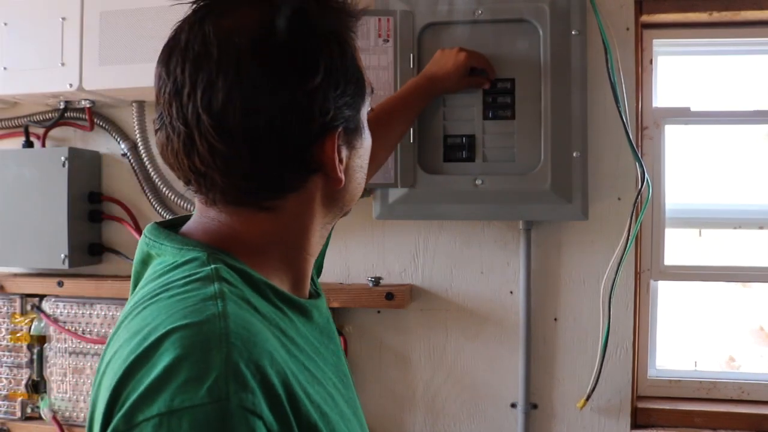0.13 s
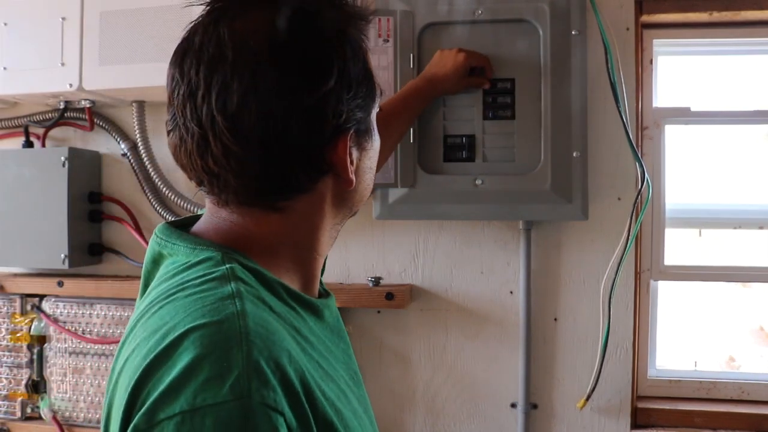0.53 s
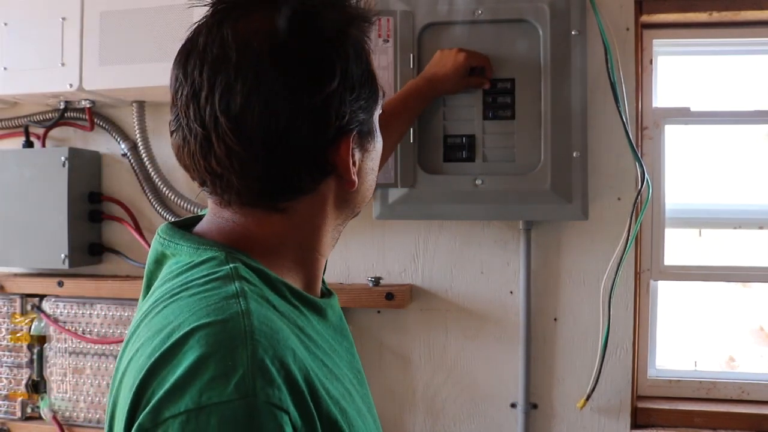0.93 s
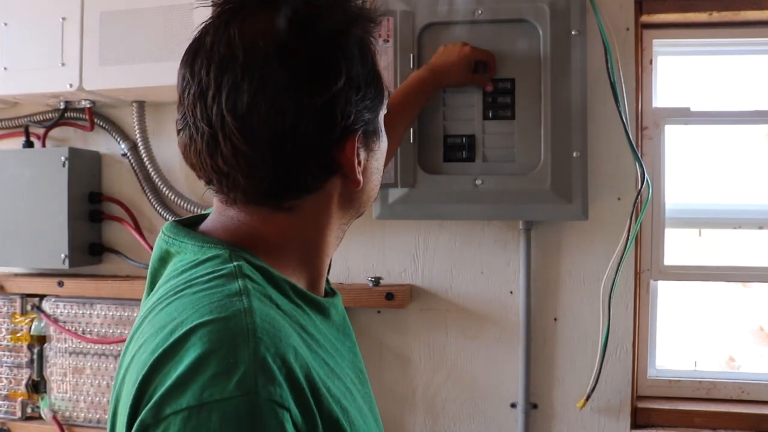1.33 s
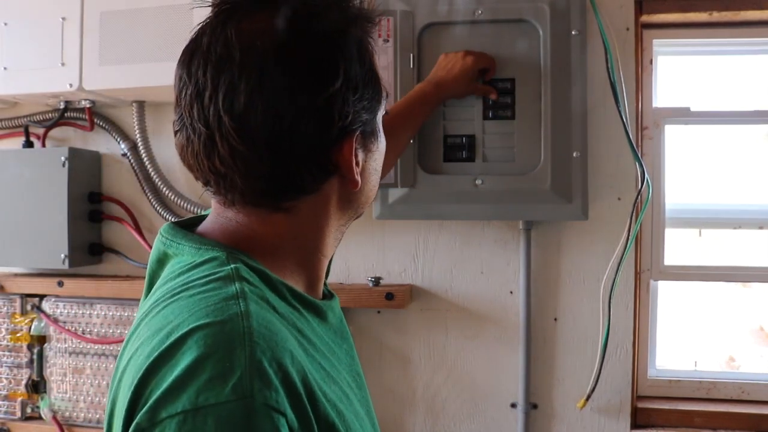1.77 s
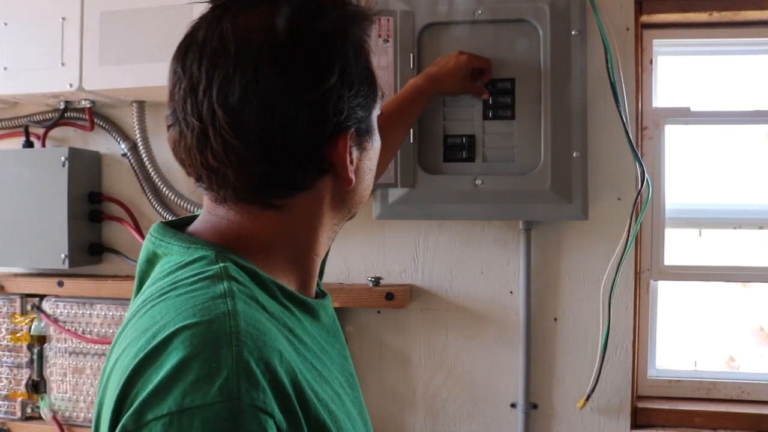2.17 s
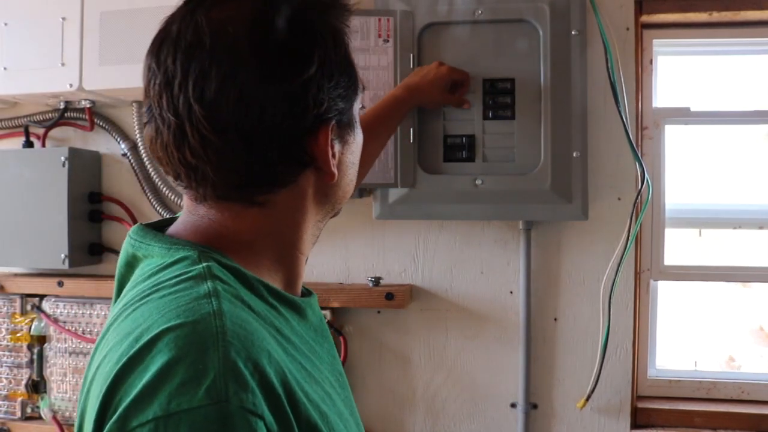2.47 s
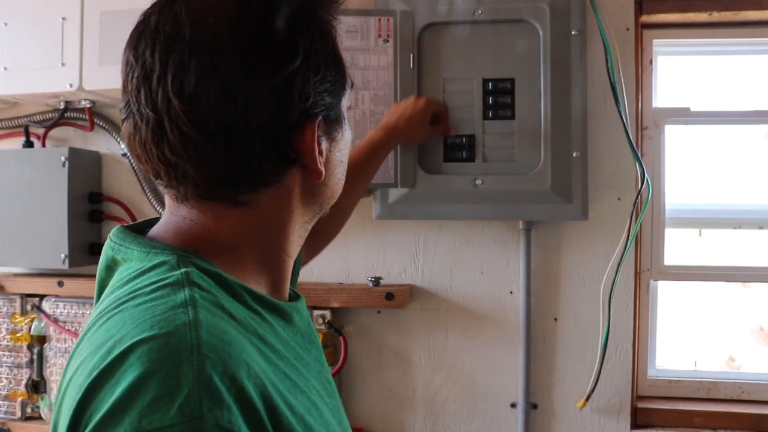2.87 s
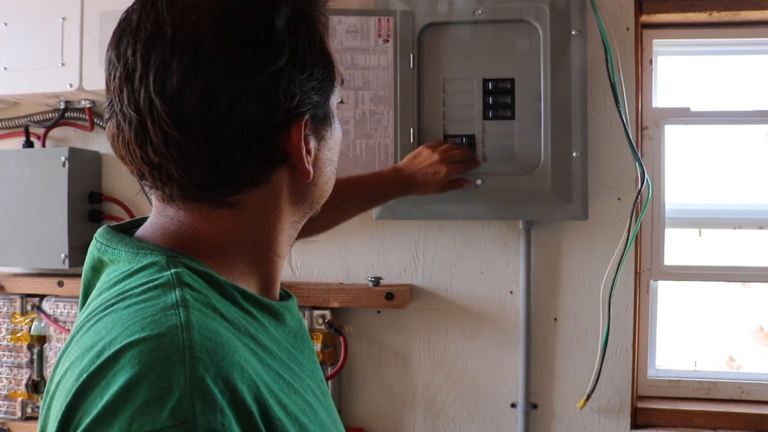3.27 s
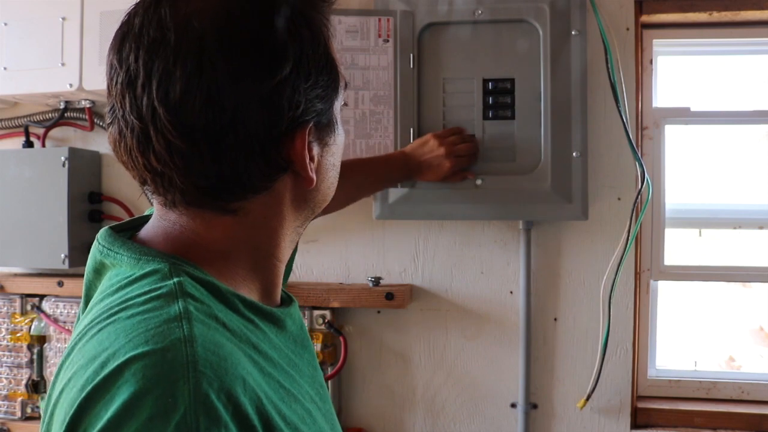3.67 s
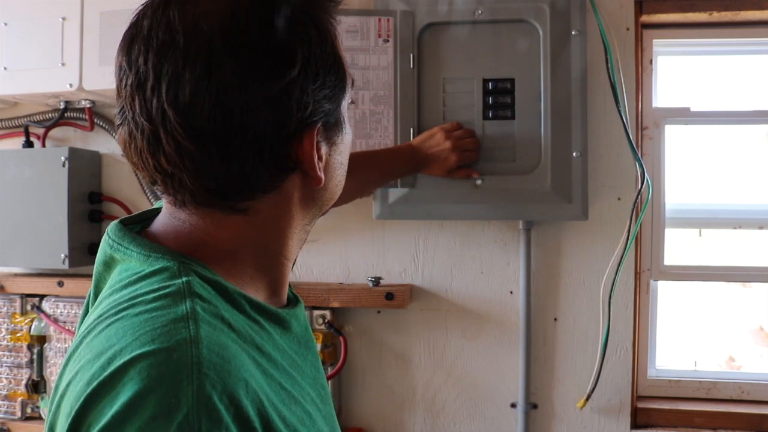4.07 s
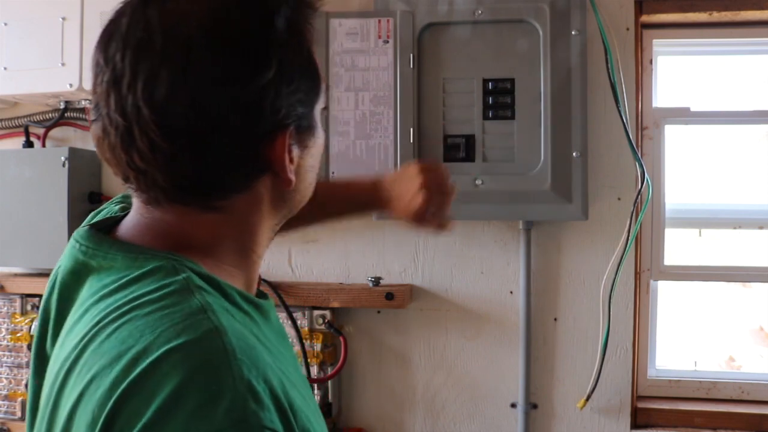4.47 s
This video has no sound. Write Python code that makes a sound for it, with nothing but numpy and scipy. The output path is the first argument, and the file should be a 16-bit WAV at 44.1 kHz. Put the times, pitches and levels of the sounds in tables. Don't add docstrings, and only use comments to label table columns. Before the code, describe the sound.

Low muffled outdoor air and faint electrical whines. Two bright, spring-loaded plastic snaps come under a second apart, each preceded by a small latch tick and followed by a short metallic ring. Later, grip clicks lead to a deeper, longer slam; the steel cover shudders, then the hand knocks it on leaving. Close microphone, clipping on the slams, its level ducking briefly; short wooden-room tail.

```python
import sys
import numpy as np
from scipy import signal
from scipy.io import wavfile
from scipy.ndimage import uniform_filter1d

SR = 44100
rng = np.random.default_rng(int(sys.argv[2]) if len(sys.argv) > 2 else 0)


def pcm_store(signal):
    levels = np.round(np.clip(np.atleast_2d(signal), -1, 1) * 32767)
    wavfile.write(sys.argv[1], SR, levels.astype(np.int16).T)


def ratio(d):
    e = np.asarray(d, float) / 20
    return 10 ** e


N = 202931
MAIN_GRIP_S = 2.5


def at_hz(points, hz):
    table = np.array(points)
    return np.interp(np.log(hz), np.log(table[:, 0]), table[:, 1])


def rms_one(x):
    return x / np.sqrt(np.mean(x ** 2) + 1e-20)


def drift(rate_hz):
    count = int(N / SR * 40) + 2
    slow = uniform_filter1d(rng.standard_normal(count), size=3)
    return np.interp(np.arange(N) / SR * np.clip(rate_hz, 0.1, 39), np.arange(count), rms_one(slow))


def ring(clicks, hz, t60):
    r = ratio(-60 / (t60 * SR))
    w = 2 * np.pi * min(hz, SR / 2 - 2000) / SR
    return signal.lfilter([0, np.sin(w)], [1, -2 * r * np.cos(w), r * r], clicks + 1e-18)


def narrow_noise(length, hz, width_hz):
    return ring(rng.standard_normal(length), hz, np.log(1000) / np.pi / width_hz)


def bands():
    edges = 22 * 2 ** (np.arange(30) / 3)
    white = rng.standard_normal((2, N))
    for k, (low, high) in enumerate(zip(edges, edges[1:])):
        sos = signal.butter(2, [low, high], "band", fs=SR, output="sos")
        yield np.sqrt(low * high), signal.sosfilt(sos, white[k % 2])


def add(out, s, x):
    at = round(s * SR)
    out[at:at + len(x)] += x[:N - at]


def slam_s(rows):
    return rows[1][0]


# frequency in Hz, level in dB per Hz.
AIR = [(15, -48), (25, -23), (87, -2.5), (135, -6), (168, -5), (201, -11.5), (245, -6), (408, -11),
       (582, -12), (1040, -15), (1970, -19), (2510, -18.5), (5000, -26.5), (6500, -58), (11000, -120)]
# time in seconds, level in dB.
BREEZE = [(0.0, -58.5), (0.4, -54), (0.801, -56.5), (1.5, -56.5), (2.001, -54.5), (2.3, -58.5),
          (2.801, -57.5), (3.0, -59), (3.4, -57), (3.8, -54.5), (4.6, -56)]


def air(rumble_hz, patchy_db):
    t = np.arange(N) / SR
    settle_s, rumble_rest_db, shake_db = 0.9, -4.5, 9
    slams = [slam_s(rows) for rows in (SMALL_A, SMALL_B, MAIN)]
    shake = sum((t > s) * np.exp(-np.abs(t - s) / settle_s) for s in slams)
    rumble_db = rumble_rest_db + shake_db * np.tanh(uniform_filter1d(shake, size=8192))
    out = 0
    for hz, noise in bands():
        low_db = rumble_db / (1 + (hz / rumble_hz) ** 2)
        out = out + noise * ratio(at_hz(AIR, hz) + low_db + patchy_db * drift(8))
    return rms_one(out) * ratio(np.interp(t, *np.transpose(BREEZE)) - 2.0)


# frequency in Hz, level in dB, start in seconds, end in seconds, width in Hz.
WHINES = [(600, -66.5, 0.05, 0.5, 25), (550, -67, 0.5, 1.7, 25), (1801, -70, -0.5, 1.8, 10),
          (2043, -73, -0.5, 2.1, 10), (1921, -72.5, 2.0, 4.0, 10), (620, -70, 2.7, 3.4, 40)]


def whines(blur_db):
    t, out = np.arange(N) / SR, 0
    for hz, db, start, end, width_hz in WHINES:
        blur = ratio(blur_db) * rms_one(narrow_noise(N, hz, width_hz))
        line = np.sin(2 * np.pi * hz * t) * 10 / width_hz
        gate = np.clip(np.minimum(t - start, end - t) / 0.028, 0, 1)
        out = out + ratio(db) * gate * rms_one(blur + line)
    return out


# frequency in Hz, t60 in seconds.
TAIL_T60 = [(60, 0.43), (100, 0.45), (200, 0.49), (500, 0.39), (1500, 0.35), (3000, 0.31), (6000, 0.25),
            (10000, 0.27), (15000, .22)]


def tail(groups, boom_hz, patchy_db):
    out = 0
    for hz, noise in bands():
        energy = np.zeros(N) + 1e-18
        for contacts, colour in groups:
            s, tail_db, boom_db = np.array(contacts)[:, [0, 4, 5]].T
            level_db = tail_db + at_hz(colour, hz) + boom_db / (1 + (hz / boom_hz) ** 2)
            energy[np.round(s * SR).astype(int)] = ratio(2 * level_db)
        fall = ratio(-120 / (at_hz(TAIL_T60, hz) * SR))
        rise = np.exp(-1 / ((0.0024 + 1.5 / hz) * SR))
        energy = signal.lfilter([1 - rise], np.convolve([1, -fall], [1, -rise]), energy)
        out = out + noise * np.sqrt(np.abs(energy)) * ratio(13.0 + patchy_db * drift(30))
    return out


# frequency in Hz, level in dB per Hz.
TAIL_SMALL = [(24, -58.5), (60, -29), (150, -21), (300, -4), (700, -9.5), (1400, -9.5), (2200, -16.5),
              (3200, -2), (5400, -12.5), (8000, -17), (11000, -24), (16000, -31.5)]
TAIL_MAIN = [(24, -64.5), (60, -19), (130, -9.5), (270, -3.5), (600, -7), (1300, -4.5), (2100, -9),
             (3200, -4), (5000, -16), (7500, -21), (11000, -29.5), (16000, -49)]


def shed(small, main, light):
    early = [c for c in light if c[0] < MAIN_GRIP_S]
    late = [c for c in light if c[0] > MAIN_GRIP_S]
    return tail([(small + early, TAIL_SMALL), (main + late, TAIL_MAIN)], boom_hz=596, patchy_db=2.0)


# time in seconds, level in dB.
KNOCKS = [
    (1.113, -22),
    (1.14, -24.5),
    (4.0165, -22.5),
    (4.027, -28),
    (4.3, -55),
    (4.5925, -24),
]
# frequency in Hz, level in dB, t60 in seconds.
COVER = [(245, -6.5, 0.1), (295, -2.5, 0.09), (432.5, -1, 0.1), (536, 5.5, 0.1), (844, -3.5, 0.044),
         (1202, -8.5, 0.027)]


def knocks():
    out = np.zeros(N)
    push = np.r_[np.hanning(24), np.zeros(SR // 4)] / 12
    for s, level_db in KNOCKS:
        luck_db = rng.normal(0, 2.6, len(COVER))
        for luck, (hz, db, t60) in zip(luck_db, COVER):
            add(out, s, ratio(level_db - 10.0 + db + luck) * ring(push, hz, t60))
    return out


def touches(rows, rattle_ms, tail_db, boom_db):
    return [(s, db, rattle_ms, hz, db + tail_db, boom_db) for s, db, hz in rows]


# time in seconds, clack in dB, pitch in Hz.
LATCHES = [
    (1.0220, -30.5, 4196),
    (1.7305, -28.5, 2920),
    (3.9600, -44, 3020),
    (3.9755, -29, 3170),
]
BUMPS = [
    (1.1130, -18, 1270),
    (1.143, -42, 1410),
    (3.998, -36, 3500),
    (4.015, -28.5, 2630),
    (4.5925, -16.5, 1660),
]
FINGERS = [
    (0.369, -44.5, 4160),
    (0.4800, -51.5, 3100),
    (1.4300, -53.5, 3200),
]
TAPS = [(2.962, -55, 3300), (3.541, -58.5, 2990), (3.7600, -60, 3170)]
# time in seconds, clack in dB.
LOOSE_MAIN = [(4.188, -37), (4.21, -19), (4.2420, -30), (4.263, -20.5), (4.2800, -21), (4.3050, -48),
              (4.3330, -24.5), (4.3800, -47)]


def light_contacts():
    out = touches(LATCHES, rattle_ms=2.0, tail_db=-13, boom_db=-2.5)
    for bump in BUMPS:
        boom_db = 13 if bump[0] > MAIN_GRIP_S else 10
        out += touches([bump], rattle_ms=1.2, tail_db=-10, boom_db=boom_db)
    out += touches(FINGERS, rattle_ms=8.9, tail_db=-15.5, boom_db=-7)
    out += touches(TAPS, rattle_ms=6.3, tail_db=-2.55, boom_db=8.9)
    for s, db in LOOSE_MAIN:
        tail_db = -16 + 0.42 * db - 53.5 * (s - LOOSE_MAIN[0][0])
        out.append((s, db, 2.3, 2870, tail_db, 12))
    return out


def ringing(s, level_db, modes, build_cycles):
    t, out = np.arange(SR) / SR, np.zeros(N)
    for hz, width_hz, db, t60 in modes:
        cluster = rms_one(narrow_noise(SR + 8192, hz, width_hz)[8192:])
        build = 1 - np.exp(-t * hz / build_cycles)
        add(out, s, ratio(level_db + db - 60 * t / t60) * build * cluster)
    return out


# frequency in Hz, width in Hz, level in dB,
# t60 in seconds.
RING_A = [(90.5, 6.4, -12, 0.8), (186, 40, -10.5, 0.5), (364, 110, -9, .5), (930, 44, -9.5, .4),
          (1477, 17, -20.5, 0.8), (2870, 16, -1.5, .4), (3100, 110, 1.5, 0.35), (5200, 250, -9, 0.32),
          (9300, 12, -31, .5)]
RING_B = [(84, 20, -15, 1.36), (324, 21, -10, 0.47), (1449, 22, -2, 0.3457), (2920, 17, -2.5, 0.43),
          (3600, 300, 0, 0.33), (5380, 300, 0.5, 0.34), (6774, 14, -21, 0.66)]
RING_MAIN = [(123.4, 32, 1.5, 0.74), (186, 25, -23, 0.86), (243, 13, 4.5, 0.59), (292.6, 14, 2, 0.81),
             (377, 25, -9, 0.16), (985.4, 12, -7, 0.57), (2557, 80, -2.5, 0.27), (3152, 110, 0.5, 0.47),
             (4600, 220, -12.5, 0.43)]


def springs():
    return (ringing(slam_s(SMALL_A), -19.5, RING_A, build_cycles=13)
            + ringing(slam_s(SMALL_B), -25, RING_B, build_cycles=12)
            + ringing(slam_s(MAIN), -16, RING_MAIN, build_cycles=58))


def clacks(contacts, housing, crack_db):
    out, t = np.zeros(N), np.arange(4096) / SR
    multiples = [k for k, db, t60 in housing]
    levels_db = [db for k, db, t60 in housing] + [crack_db]
    haste = np.maximum(multiples + [2.5], 1)[:, None] ** 0.34
    rise = 1 - np.exp(-1000 * t / 0.44)
    for s, clack_db, rattle_ms, hz, tail_db, boom_db in contacts:
        clicks = rng.standard_normal((len(housing) + 1, len(t)))
        rattle = clicks * np.exp(-1000 * t * haste / rattle_ms) * rise
        parts = [ring(r, hz * k, t60) for r, (k, db, t60) in zip(rattle, housing)]
        parts.append(np.diff(rattle[-1], prepend=0))
        for db, part in zip(levels_db, parts):
            add(out, s, ratio(clack_db - 4.0 + db) * part / np.abs(part).max())
    return out


# multiple of the pitch, level in dB,
# t60 in seconds.
HOUSING_A = [(0.469, -19, .03), (0.99, 1, 0.03), (1.03, -13, .09), (1.12, -14.5, .04), (1.4, -12.5, .02),
             (1.701, -2, 0.0092), (2.6, -10.5, .012), (3.199, -5.5, .008), (4.198, -18.5, .008)]
HOUSING_B = [(.51, -18.5, .05), (0.822, -15.5, 0.035), (1.003, -5.5, 0.034), (1.1, 1, 0.015),
             (1.25, -22.5, 0.067), (1.581, -13.5, 0.017), (1.9, -1, 0.008), (2.5, -7, .015),
             (2.9, -12, 0.008), (3.3, -9, .008), (4.3, -11, 0.01)]
HOUSING_MAIN = [(.45, -22, .02), (0.866, -8.5, 0.055), (0.995, 0.5, 0.025), (1.084, -8, 0.058),
                (1.215, -7.5, 0.017), (1.51, -1.5, 0.012), (1.67, -1.5, 0.014), (1.8, -7.5, 0.011),
                (2.6, -15, 0.0103), (3.8, -37, .01)]
TICK = [(.55, -12, 0.0097), (.8, -4, 0.01), (1.001, 3.7, 0.01), (1.2, -1, 0.0067), (1.801, -9.5, 0.007),
        (2.8, -15.5, 0.0034)]


def snaps(a, b, main, light):
    return (clacks(a, HOUSING_A, crack_db=-3.5) + clacks(b, HOUSING_B, crack_db=-2.5)
            + clacks(main, HOUSING_MAIN, crack_db=-13) + clacks(light, TICK, crack_db=-9.5))


# time in seconds, clack in dB, tail in dB.
SMALL_A = [
    (1.0608, -16.5, -27),
    (1.0638, 4.5, -16.5),
    (1.0850, -26.5, -32),
]
SMALL_B = [
    (1.7588, -27, -38),
    (1.7614, 2, -16.5),
    (1.7673, -6.5, -36),
]
MAIN = [
    (4.1292, -32, -43),
    (4.1320, 4.5, -14.5),
    (4.1510, -14, -31),
    (4.1680, -11, -18.5),
]


def throw(rows, rattle_ms, hz, boom_db):
    return [(s, db, rattle_ms, hz, tail_db, boom_db) for s, db, tail_db in rows]


def scene():
    a = throw(SMALL_A, rattle_ms=0.39, hz=2922, boom_db=-8)
    b = throw(SMALL_B, rattle_ms=0.63, hz=2865, boom_db=-1.5)
    main = throw(MAIN, rattle_ms=2.6, hz=3003, boom_db=-14)
    light = light_contacts()
    struck = snaps(a, b, main, light) + springs() + knocks() + shed(a + b, main, light)
    no_bass = signal.butter(2, 78, "high", fs=SR, output="sos")
    panel = signal.sosfilt(no_bass, struck)
    return np.tile(panel + air(rumble_hz=200, patchy_db=2.06) + whines(blur_db=-4.5), (2, 1))


def gain_control(x, threshold_db, release_db_s, attack_ms):
    climb = release_db_s * np.arange(N) / SR
    level_db = 20 * np.log10(np.abs(x).max(axis=0) + 1e-9)
    held_db = np.maximum.accumulate(level_db + climb) - climb
    excess_db = np.maximum(held_db - threshold_db, 0)
    r = np.exp(-1000 / (attack_ms * SR))
    return x * ratio(-signal.lfilter([1 - r], [1, -r], excess_db))


def band_limit(x):
    return signal.sosfilt(signal.butter(12, 16440, fs=SR, output="sos"), x)


def record(dry):
    hiss = ratio(-64 + 6.0) * signal.lfilter([1, -0.2], [1], rng.standard_normal((2, N)))
    ducked = gain_control(dry + hiss, threshold_db=-1.5, release_db_s=120, attack_ms=16.0)
    overloaded = np.clip(ducked, -0.97, 0.97)
    treble_limit = signal.cheby2(12, 60, 16300, fs=SR, output="sos")
    return band_limit(signal.sosfilt(treble_limit, overloaded))


dry = scene()
out = record(dry)
pcm_store(out)
```